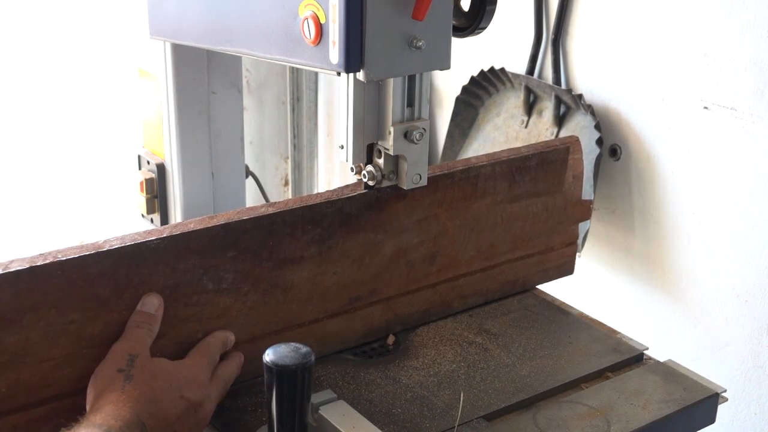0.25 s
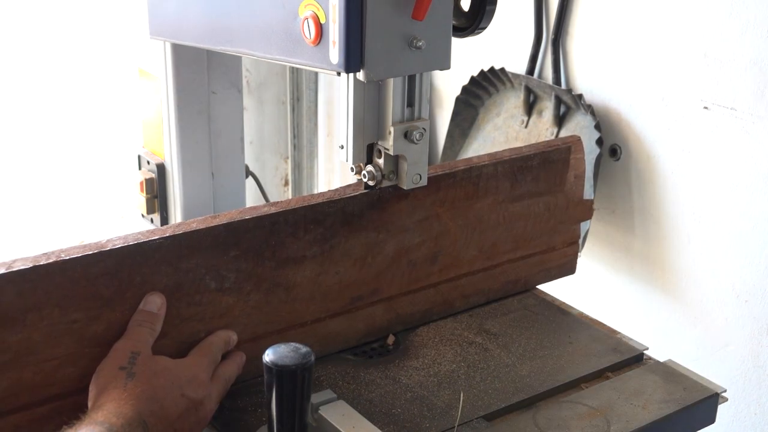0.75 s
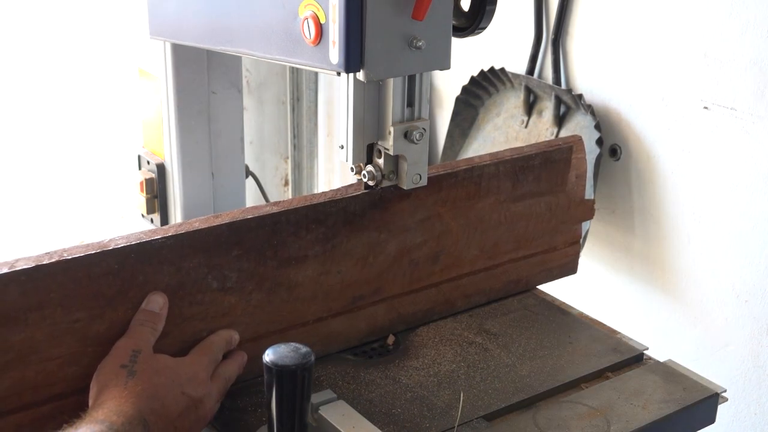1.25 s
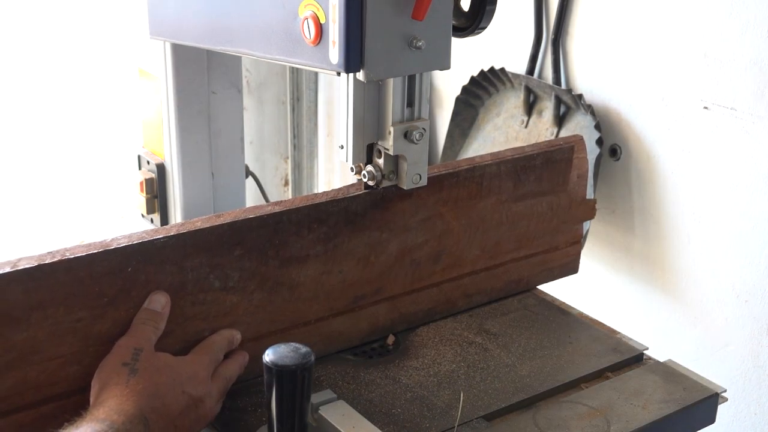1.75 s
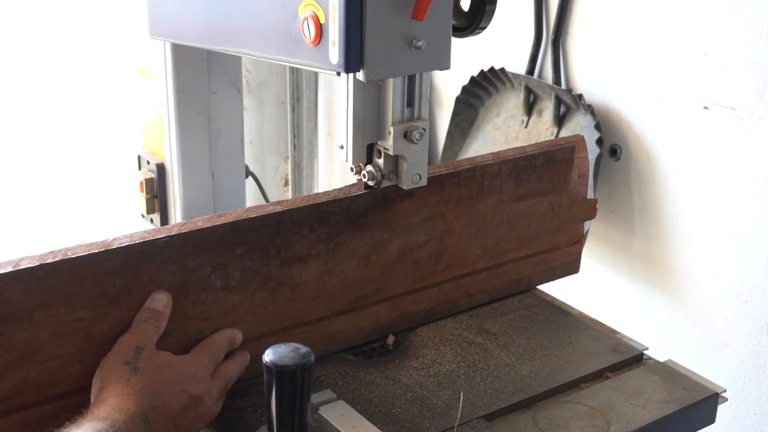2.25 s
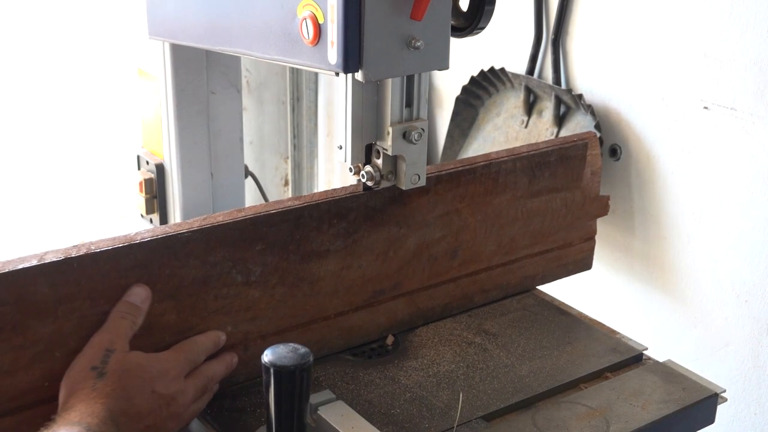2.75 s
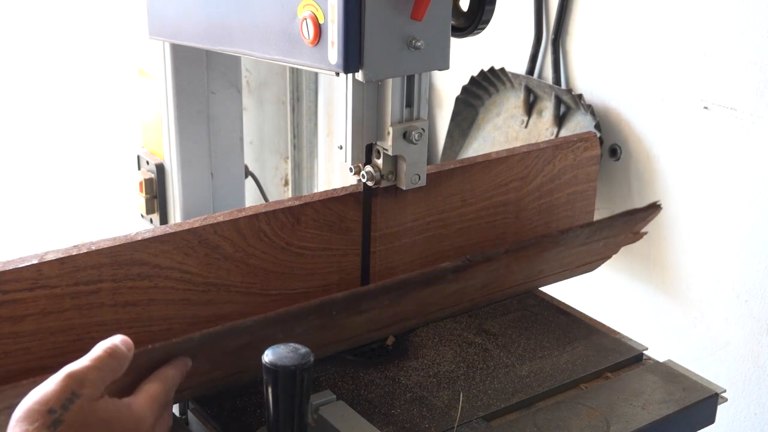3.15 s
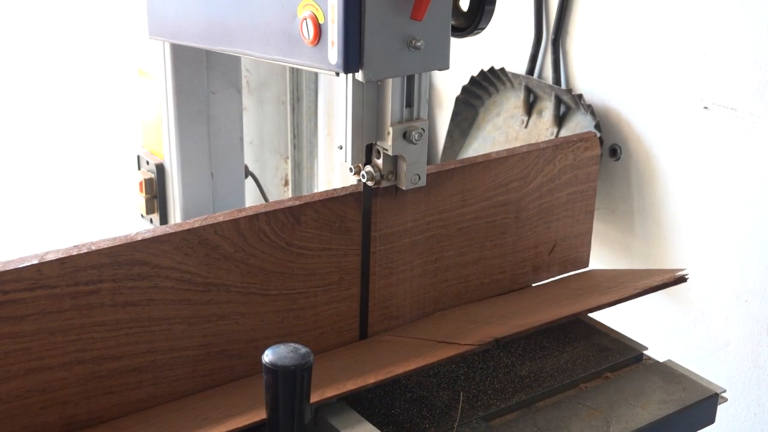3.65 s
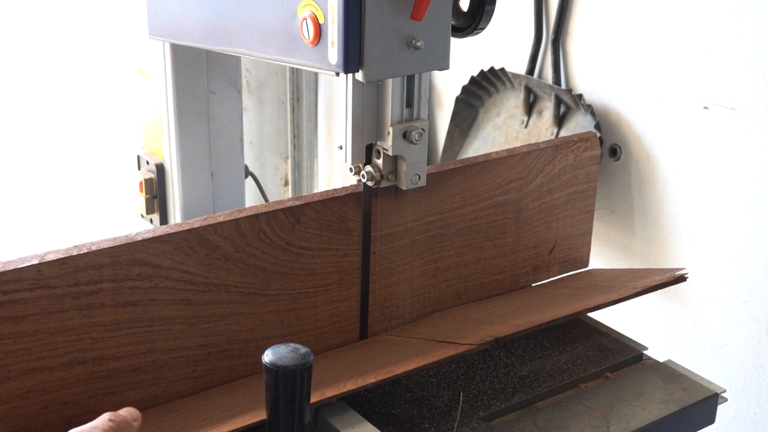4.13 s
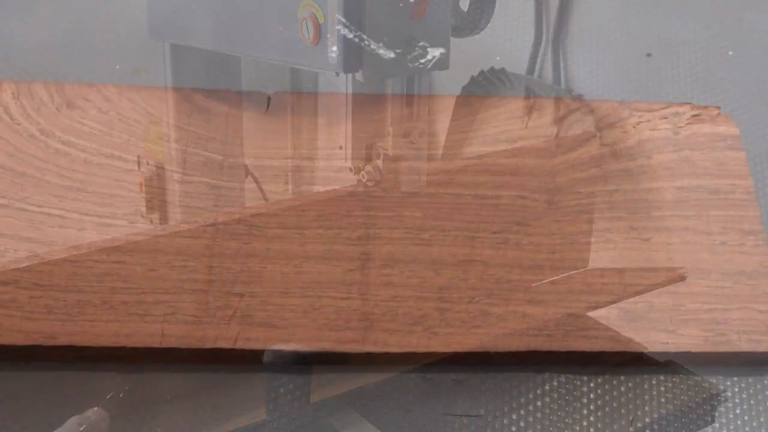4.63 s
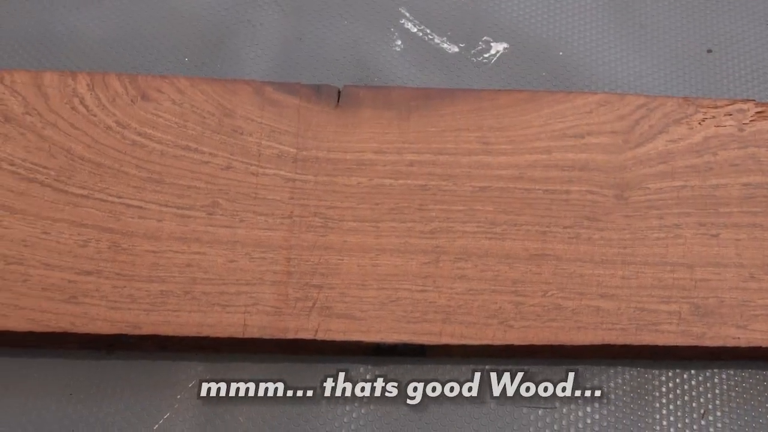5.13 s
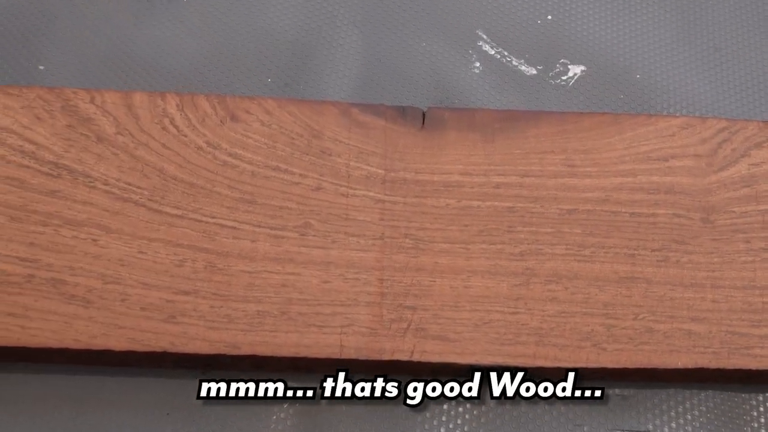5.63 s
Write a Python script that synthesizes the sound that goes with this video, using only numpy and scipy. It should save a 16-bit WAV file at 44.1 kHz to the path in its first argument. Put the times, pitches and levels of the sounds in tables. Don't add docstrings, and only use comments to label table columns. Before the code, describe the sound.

The sound starts abruptly with a bandsaw cutting into a hardwood board in a small workshop, mono and fairly close. During the first 0.2 seconds the board end rings and short squeaks stand out against a rough buzz. Until about 2.2 seconds the teeth chatter in a nasal mid-high buzz, wobbling and surging in uneven bites roughly ten or more times a second, with dry, bright fibre hiss and brief high blade singing. A dust fan whines and roars steadily behind. From 2.2 the chatter thins, leaving hiss, small squeaks and a last spray as the board parts near 2.7. At 2.9 the fan abruptly becomes louder and closer, a steady mid-pitched whine with rushing air and fine blade whirr. From 3.8 it fades smoothly, gone by about 5.4. A deep wind gust rumbles around 4.4; very faint traffic remains, and a tiny falling bird whistle echoes at 5.7.

```python
import sys
import numpy as np
from scipy import signal
from scipy.fft import rfft, irfft, next_fast_len
from scipy.io import wavfile
from scipy.ndimage import uniform_filter1d

SR = 44100
rng = np.random.default_rng(int(sys.argv[2]) if len(sys.argv) > 2 else 0)


def master(y):
    cut = np.clip(np.atleast_2d(y).T, -1, 1)
    pcm = np.round(cut * 32767)
    wavfile.write(sys.argv[1], SR, pcm.astype(np.int16))


def natural_amplitude(level_db):
    exponent = np.asarray(level_db, float) / 20
    return 10 ** exponent


N = 259304
T = np.arange(N) / SR

TOOTH_HZ = 473
UNLOAD_S, UNLOADING_S = 2.22, 0.43
DRIFT_S = .98
FADE_FROM_S, FADE_TO_S, FADE_POWER = 3.77, 5.363, 1.21

# [t/s, 3rd multiple lift/dB, 6th multiple lift/dB, fibre lift/dB]
BITE_EVENTS = [(0.057, 3.5, 8.5, 0.8), (0.129, 2, 5.5, 5), (0.21, 5.5, 14, -1.5), (0.306, 5, 8.5, 3),
               (0.387, 6.5, 11.5, 3), (0.584, 5.5, 8, 1.5), (0.658, 9.5, 14.5, 0.5), (0.716, 9, 6, 5),
               (0.778, -2.5, 4.5, 2), (0.862, 6.5, 19, 2.5), (0.925, 8.5, 17, 3.5), (1.014, 11, 7, 5),
               (1.124, 6, 12, 1), (1.179, -6, 16, 3), (1.265, 5, 7, 6), (1.325, -4, 17, 0),
               (1.387, -3.5, 26, -1), (1.466, 8, 16, 4.5), (1.523, 3.5, 15, 5.5), (1.6, 11, 21, 3),
               (1.721, 4.5, 9, 0.5), (1.794, 2.5, 12, 2), (1.854, -1.5, 17.5, 0), (2.019, 5.5, 15.5, 3.5),
               (2.083, 7.5, 7, 1.5), (2.312, 5, 4, 1.5), (2.394, 13, 17, 6.5), (2.538, -13, 3.4, 6),
               (2.645, 15, 4, 1), (2.692, 4, 4.4, 5)]
# [t/s, feed pressure/dB, grip of the teeth/dB]
HAND_FEED = [(0, 5, 1.5), (.142, 3.5, 4), (.168, -2.5, -4), (.222, 3, -3.5), (.23, -1, -2), (.45, 2, 1),
             (1.0, 1.5, -1.5), (1.2, 1, 2), (1.65, 0.5, -2.5), (1.8, 3, 1.5), (1.95, 0, -1), (2.1, 1, -5),
             (2.22, -1, -12.5), (2.545, -4, -16), (2.61, -12, -24), (2.62, -1, -23), (2.7, -6.5, -25),
             (2.74, -20, -23)]
# [t/s, width/s,
# level/dB]
LAP_SHIFTS = [(.02, 0.0085, 5.5), (.066, 0.017, 12.5), (.148, 0.016, 13), (.51, 0.037, 9.5),
              (.775, .045, 11), (1.04, 0.063, 8), (1.28, .03, 5), (1.56, .05, 7.5), (1.92, .04, 5)]
# [t/s, level/dB]
SCENE_CHANGES = [
    (.2245, -42),
    (2.9045, -50),
]
ENTERED_S, CLOSE_S = SCENE_CHANGES[0][0], SCENE_CHANGES[1][0]


def curves(table):
    s, *columns = np.transpose(table)
    gate = natural_amplitude(np.interp(T, [s[-1], s[-1] + .02], [0, -120]))
    return [np.interp(T, s, column) for column in columns], gate


def unit(x):
    return x / np.sqrt(np.mean(x ** 2))


def noise(points, peaks=(), lo_hz=0, hi_hz=30000):
    f = np.arange(1, N // 2 + 2) * SR / N
    point_hz, point_db = np.array(points).T
    gain = natural_amplitude(np.interp(np.log(f), np.log(point_hz), point_db))
    for hz, width, db in peaks:
        gain = gain * natural_amplitude(db / (1 + (2 * (f - hz) / width) ** 2))
    in_band = (f > lo_hz) & (f < hi_hz)
    share = np.sum(gain[in_band] ** 2) / np.sum(gain ** 2)
    coloured = irfft(rfft(rng.standard_normal(N)) * gain, N)
    return unit(coloured) / np.sqrt(share)


def walk(rate):
    k = int(SR / rate)
    steps = np.repeat(rng.standard_normal(N // k + 1), k)
    return unit(uniform_filter1d(uniform_filter1d(steps, k), k)[:N])


def room(x, t60, wet_db):
    t = T[:SR // 2]
    tail = rng.standard_normal(len(t)) * np.exp(-np.log(1000) * t / t60) * (t > .003)
    tail = natural_amplitude(wet_db) * tail / np.sqrt(np.sum(tail ** 2))
    return (x + signal.fftconvolve(x, tail)[:N]) / np.sqrt(1 + natural_amplitude(2 * wet_db))


def tone(hz):
    return 2 * np.pi * np.cumsum(hz) / SR


def ring(hz, db, wobble, flicker_db):
    level = np.sqrt(2) * natural_amplitude(db + flicker_db * walk(39.95))
    return level * np.sin(tone(hz * (1 + wobble * walk(30))))


def ramp(start_s, length_s):
    return np.clip((T - start_s) / length_s, 0, 1)


def swells(rows):
    coarse = T[::64]
    lift_db = sum(db * np.exp(-((coarse - s) / width) ** 2) for s, width, db in rows)
    return np.interp(T, coarse, lift_db)


def bites(column, width):
    return swells([(row[0], width, row[column]) for row in BITE_EVENTS])


def fade():
    turn = np.pi / 2 * ramp(FADE_FROM_S, FADE_TO_S - FADE_FROM_S)
    workshop = np.maximum(np.cos(turn), 0) ** FADE_POWER * (T < FADE_TO_S)
    return workshop, np.sin(turn)


def teeth():
    # [level/dB, share of grip, share of shift, lift at entry/dB]
    multiples = [
        (-40, 0.92, -.9, 1.5),
        (-56, .5, 1.2, 4),
        (-55.5, .4, .9, 3),
        (-50.5, .3, -.4, -2.5),
    ]
    other_multiples = {5: -8, 7: -5, 8: -4, 9: -8, 10: -10}
    # [f/Hz, level re multiple/dB]
    near_3rd = [(1392, -2.5), (1465, -6)]
    # [f/Hz, level re multiple/dB]
    near_2nd = [(930, -3), (975, -4), (996, -5)]
    # [f/Hz, level re multiple/dB]
    near_4th = [(1925, -5), (1965, -2)]

    (_, grip_db), cutting = curves(HAND_FEED)
    shift_db = swells(LAP_SHIFTS)
    db3, db2, db4, db6 = (
        db + grip * grip_db + shift * shift_db + entry * (T < ENTERED_S)
        for db, grip, shift, entry in multiples)
    db3 = db3 + bites(column=1, width=0.02) - 5.0
    db6 = db6 + 0.81 * bites(column=2, width=0.011) - 6.0

    sag = .022
    marks = np.array(BITE_EVENTS)[:, 0]
    slide_s = np.ravel([marks - .025, marks + .025], "F")
    slide = np.interp(T, slide_s, np.tile([sag, -sag], len(marks)))
    chatter = ring(3 * TOOTH_HZ * (1.011 + slide), db3, wobble=.01, flicker_db=1.2)
    chatter = chatter + ring(6 * TOOTH_HZ * (1 + .3 * slide), db6, wobble=.004, flicker_db=1.5)

    firm = [(2 * TOOTH_HZ, db2 - 5.0), (4 * TOOTH_HZ, db4 - 2.0)]
    firm += [(hz, db3 + db) for hz, db in near_3rd]
    firm += [(hz, db4 - 2.0 + db) for hz, db in near_4th]
    loose = [(hz, db2 - 6.5 + db) for hz, db in near_2nd]
    loose += [(k * TOOTH_HZ, (db4 + db6) / 2 + db) for k, db in other_multiples.items()]
    chatter = chatter + sum(ring(hz, db, wobble=.005, flicker_db=2.5) for hz, db in firm)
    chatter = chatter + sum(ring(hz, db, wobble=.007, flicker_db=4) for hz, db in loose)
    return cutting * room(chatter + singing_blade(), t60=.2, wet_db=-11)


def singing_blade():
    # [t/s, width/s, f/Hz, level/dB]
    songs = [(1.5, .25, 1960, -51), (2.4, 0.28, 4600, -55), (1.1, 0.09, 3400, -51), (.75, 0.09, 3290, -54),
             (2, .3, 3800, -55.5), (2.3, .2, 4450, -60.5)]
    return sum(np.exp(-((T - s) / width) ** 2) * ring(hz, db, wobble=.003, flicker_db=3)
               for s, width, hz, db in songs)


def fibres():
    # [f/Hz, level per Hz/dB]
    rasp_colour = [(150, -55.5), (300, -25.5), (500, -7.5), (1100, -4), (2000, 0.5), (3500, -2), (5000, -2),
                   (6500, -4), (9000, -17), (16000, -45)]
    # [f/Hz, width/Hz, lift/dB]
    board_modes = [(525, 50, 4), (1220, 50, 4), (2125, 45, 6), (2460, 90, 5), (3400, 170, 5),
                   (3790, 120, 4), (3960, 60, 4), (4430, 60, 4), (5930, 120, 3)]
    # [f/Hz, level per Hz/dB]
    hiss_colour = [(3000, -40.5), (6000, -7), (7000, -2.5), (9000, 2), (10400, -7), (10900, -22),
                   (14000, -37.5)]
    # [f/Hz, width/Hz, lift/dB]
    blade_modes = [(7030, 230, 7), (8650, 360, 5), (10300, 300, 5), (7620, 200, 7)]
    # [f/Hz, level per Hz/dB]
    dust_colour = [(6000, -24.5), (10000, -5), (11000, 3.5), (12500, 3), (14000, 0), (15000, -4),
                   (16000, -4.5)]
    # [t/s, width/s, level/dB]
    sprays = [
        (2.1, .12, 2.5),
        (2.66, 0.033, 2.5),
    ]

    (feed_db, _), cutting = curves(HAND_FEED)
    rasp_db = -44 + feed_db - 0.07 * swells(LAP_SHIFTS)
    hiss_db = .5 - .1 * feed_db - 6.5 * (T < ENTERED_S)
    dust_db = -10.5 - .5 * feed_db + swells(sprays)

    puff = unit(1 + .15 * np.cos(tone(TOOTH_HZ * (1 + .02 * walk(30)))))
    bite_db = .65 * bites(column=3, width=0.013)
    force = puff * natural_amplitude(rasp_db + bite_db - .6 + .3 * walk(65))
    rasp = natural_amplitude(-1.5 + 1.1 * walk(150)) * noise(rasp_colour, board_modes, 3300, 6000)
    hiss = natural_amplitude(hiss_db - 0.64 + 0.96 * walk(200)) * noise(hiss_colour, blade_modes)
    dust = natural_amplitude(dust_db + 4.0 + 0.74 * walk(200))
    dust = dust * noise(dust_colour, [(12500, 400, 3), (13700, 300, 4)])
    return cutting * room(force * (rasp + hiss + dust), t60=0.15, wet_db=-12.5)


def board_end():
    # [f/Hz, level/dB]
    end_modes = [(775, -63), (1895, -47.5), (2385, -48), (2700, -65), (2907, -52), (3354, -66),
                 (3790, -59.5), (4390, -59), (4790, -63)]
    entering = (T < ENTERED_S) * natural_amplitude(np.interp(T, [.15, .19], [0, -6]))
    return entering * sum(ring(hz, db, wobble=0.0069, flicker_db=3.5) for hz, db in end_modes)


def blade_span():
    # [t/s, f/Hz, level/dB]
    span_hum = [(0, 492, -44.5), (.22, 492, -54), (.3, 493, -55), (1.5, 492.5, -53), (2.4, 497, -59),
                (2.72, 502, -52.5)]
    (hz, db), humming = curves(span_hum)
    return humming * ring(hz, db, wobble=0.0041, flicker_db=2.5)


def squeaks():
    # [t/s, length/s, f/Hz, level/dB]
    rubs = [(0.008, 0.02, 935, -40), (.055, .018, 926, -37), (0.122, 0.03, 905, -40),
            (0.187, .016, 2905, -48), (2.065, .04, 1445, -41.5), (2.11, 0.037, 1465, -41),
            (2.622, .06, 3020, -50), (2.662, .045, 4520, -46.5), (2.75, 0.031, 1520, -54)]
    return sum(natural_amplitude(db) * np.exp(-((T - s) / length - .5) ** 4 * 16) * np.sin(2 * np.pi * hz * T)
               for s, length, hz, db in rubs)


def change_clicks():
    return sum(natural_amplitude(db) * np.exp(-np.maximum(T - s, 0) / .0009) * (T >= s) for s, db in SCENE_CHANGES)


def whirr():
    # [f/Hz, level per Hz/dB]
    guide_colour = [(5000, -26), (8000, -1), (10000, -6), (11000, -8.5), (12500, -4), (14000, -10),
                    (16000, -13)]
    far_db = -3.5 * (T < CLOSE_S)
    drift_db = -4 * DRIFT_S * ramp(CLOSE_S, DRIFT_S)
    running = ramp(2.66, .06) ** 2 * fade()[0]
    level = natural_amplitude(-55 + far_db + drift_db - 2.0 + .6 * walk(20))
    return running * level * noise(guide_colour, [], 9000, 15500)


def fan():
    # [far/dB, lift at entry/dB, lift once unloaded/dB, close/dB, drift when close/dB per s]
    layers = [
        (-52, 4, 2, -44.5, 0),
        (-51, -0.5, 1.5, -37.5, -1),
        (-61.5, 10.5, 3, -45.5, .5),
        (-54.5, -0.5, -0.5, -50, 5),
        (-76, 1, 4, -67.5, 0.5),
    ]
    # [t/s, f/Hz]
    blade_rate = [(0, 441.5), (1.1, 441.2), (1.5, 443.3), (2.2, 445), (2.9, 446.6), (2.91, 447.6),
                  (5.4, 447.9)]
    upper_multiples = {4: -12, 6: -12, 11: -10, 12: -11.5}
    # [f/Hz, level per Hz/dB]
    roar_colour = [(100, -48.5), (250, -21.5), (345, -12.5), (450, -13.5), (520, -15.5), (900, -13.5),
                   (1300, -14.5), (1760, -14), (3000, -16), (4400, -20.5), (6500, -22.5), (9000, -30.5),
                   (13000, -42.5), (16000, -47)]
    # [f/Hz, width/Hz, lift/dB]
    duct_modes = [(380, 40, 6), (587, 25, 7), (750, 90, 9), (810, 22, 7), (1600, 150, 4), (1802, 40, 8),
                  (2070, 60, 4), (2490, 170, 6), (2830, 60, 3), (3280, 70, 6), (3580, 30, 6),
                  (4180, 100, 4), (4890, 170, 7.5), (5090, 90, 4), (5280, 350, 4), (5800, 200, 3),
                  (7500, 500, 5)]
    # [f/Hz, level per Hz/dB]
    rumble_colour = [(15, -13.5), (30, -17), (60, -3), (110, -9), (160, -4.5), (230, -4), (300, -6),
                     (450, -35.5)]

    settling = np.exp(-T / .4)
    unloaded = ramp(UNLOAD_S, UNLOADING_S)
    drift_time = DRIFT_S * ramp(CLOSE_S, DRIFT_S)
    roar_db, *multiple_db, rumble_db = (
        np.where(T < CLOSE_S, far + entry * settling + free * unloaded, near + drift * drift_time)
        for far, entry, free, near, drift in layers)

    phase = tone(np.interp(T, *np.transpose(blade_rate)) * (1 + .00025 * walk(12)))
    whine = sum(natural_amplitude(db + .5 * walk(25)) * np.sin(k * phase + k) for k, db in enumerate(multiple_db, 1))
    whine = whine + sum(natural_amplitude(multiple_db[2] + db + 1.7 * walk(30)) * np.sin(k * phase)
                        for k, db in upper_multiples.items())
    roar = room(noise(roar_colour, duct_modes, 600, 860), t60=.25, wet_db=-10)
    roar = natural_amplitude(roar_db - 1.33 + 0.14 * walk(9)) * roar
    rumble = natural_amplitude(rumble_db) * noise(rumble_colour, [(214, 18, 3.4)], 60, 290)
    workshop = fade()[0]
    return workshop * (np.sqrt(2) * whine + roar) + workshop ** .4 * rumble


def bird():
    # [t/s, length/s, start f/Hz, end f/Hz, level/dB]
    whistles = [
        (5.726, .078, 5780, 4440, -84),
        (5.8, .022, 4550, 3800, -86),
        (5.838, .05, 4150, 3000, -86),
    ]
    release_s = .005
    song = 0
    for s, length, hz, end_hz, db in whistles:
        swell = ramp(s, min(.07, length * length / .08)) ** .9
        breath = swell * (1 - ramp(s + length - release_s, release_s))
        pitch = hz + (end_hz - hz) * ramp(s, length) ** .7
        song = song + breath * natural_amplitude(db) * np.sin(tone(pitch))
    return room(song, t60=.5, wet_db=3.0) * natural_amplitude(5)


def wind():
    # [f/Hz, level per Hz/dB]
    wind_colour = [(3, -21), (8, 6.5), (14, -1), (25, -3), (45, -23.5), (80, -36), (150, -53), (400, -75.5)]
    # [t/s, width/s, level/dB]
    gusts = [
        (4.35, .2, 17),
        (4.75, .3, 6),
        (5.4, .2, 6),
        (5.9, 0.28, -8.5),
    ]
    level = natural_amplitude(-59 + swells(gusts) + 1.6 * walk(6.1))
    return fade()[1] ** 2 * level * noise(wind_colour)


def traffic():
    # [f/Hz, level per Hz/dB]
    traffic_colour = [(35, -33.5), (60, -6), (86, -13), (125, -12), (148, -13.5), (500, -26.5),
                      (730, -22.5), (1450, -27.5), (2600, -39), (4000, -42), (8500, -54), (10000, -69.5),
                      (16000, -84)]
    return fade()[1] * natural_amplitude(-74 + 0.62 * walk(4.86)) * noise(traffic_colour)


def scene():
    saw = teeth() + fibres() + board_end() + blade_span() + squeaks() + whirr()
    yard = bird() + wind() + traffic()
    mono = saw + change_clicks() + fan() + yard
    mono = mono * ramp(0, .004)
    return np.array([mono, mono])


def low_pass(x):
    return signal.sosfilt(signal.butter(12, 16390, fs=SR, output="sos"), x)


def record(dry):
    top_hz = 15730
    size = next_fast_len(N + SR)
    f = np.arange(size // 2 + 1) * SR / size
    passed = np.interp(f, [top_hz - 30, top_hz + 30], [1, 0]) ** 2
    mix = irfft(rfft(dry, size) * passed, size)[:, :N]
    return low_pass(mix)


dry = scene()
out = record(dry)
master(out)
```